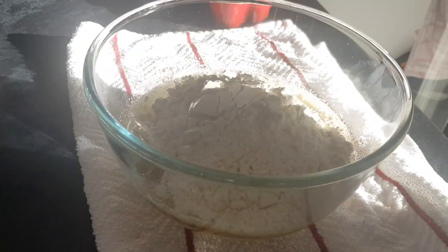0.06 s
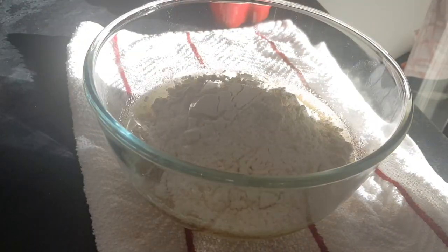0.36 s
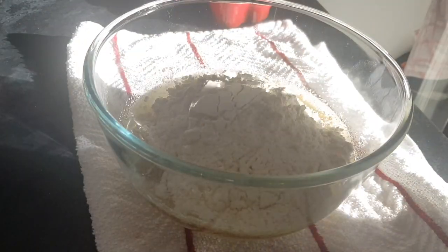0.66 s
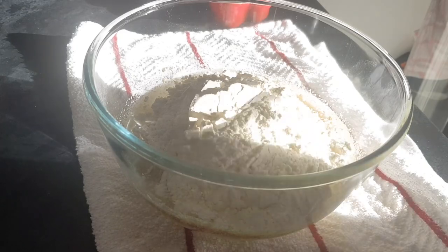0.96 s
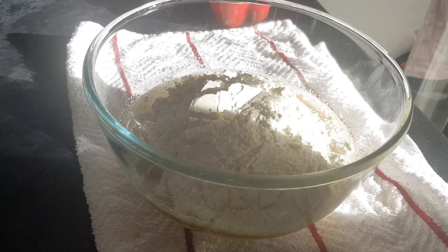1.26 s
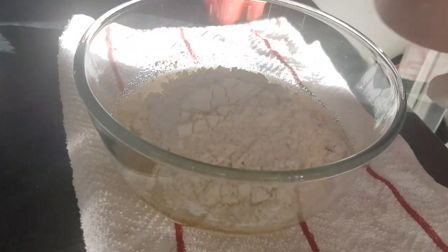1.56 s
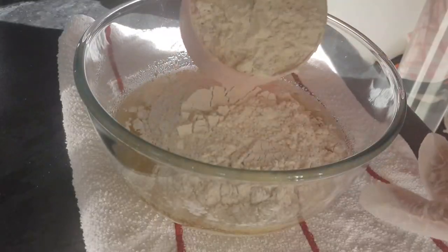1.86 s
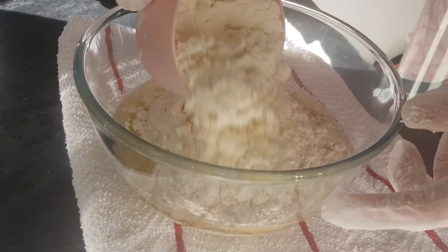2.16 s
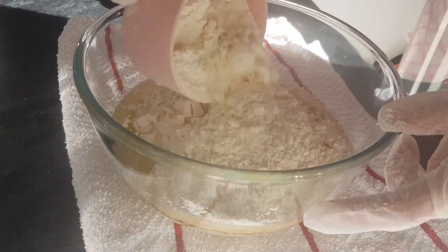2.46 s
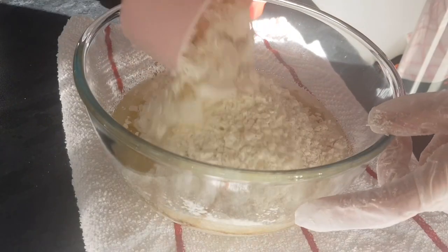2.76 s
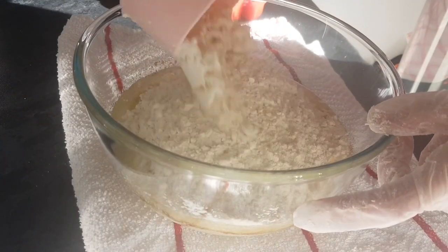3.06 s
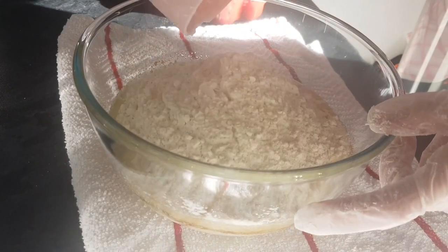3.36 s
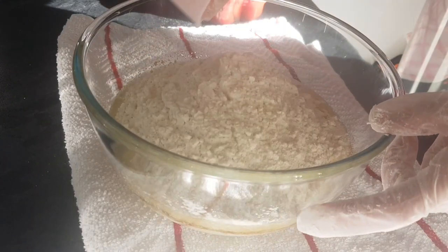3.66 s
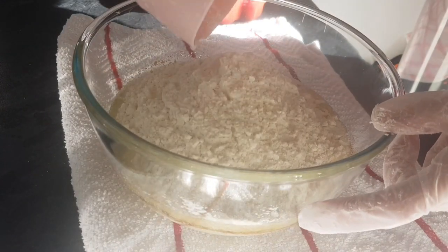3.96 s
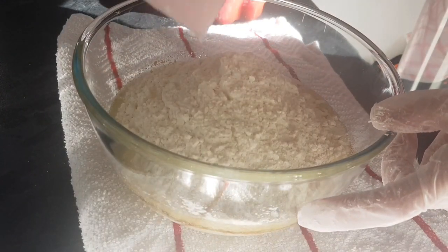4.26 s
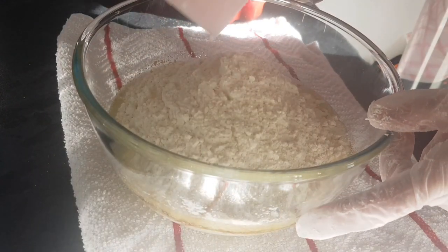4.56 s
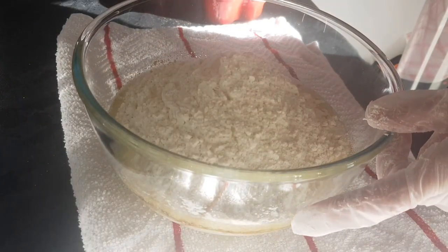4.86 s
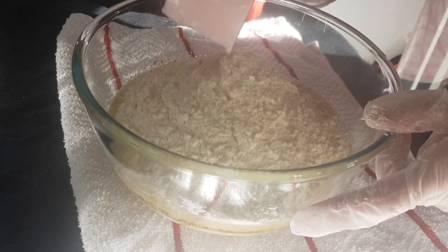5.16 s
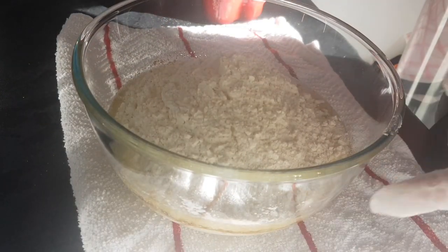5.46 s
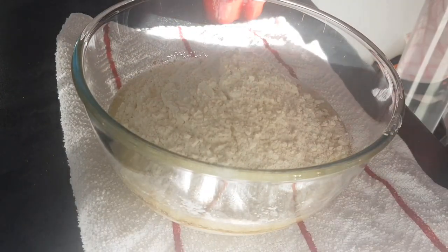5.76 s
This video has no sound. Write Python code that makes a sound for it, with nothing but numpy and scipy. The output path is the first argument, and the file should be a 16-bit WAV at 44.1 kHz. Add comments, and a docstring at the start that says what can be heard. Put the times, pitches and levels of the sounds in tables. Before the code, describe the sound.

A plastic measuring cup is knocked three times in quick succession, each a sharp crack with a short hollow ring. A gloved hand and clumps of flour then make dull, low thumps in a glass bowl resting on a towel. Flour slides out with a faint grainy hiss, the thin glove crinkles, and another muffled thud comes near the end. It sounds close, in a small kitchen with a faint appliance hum.

```python
"""Tipping flour into a bowl

In a small kitchen a plastic measuring cup is knocked three times, each a crack and a hollow ring,
then tips flour into a glass bowl on a towel. A gloved hand and falling clumps thud dully through
the worktop. Tiny slips of powder hiss, the glove crinkles, and friction sounds the air in the cup
as it scoops again. A faint appliance hum lies under it all."""
import sys
import numpy as np
from scipy import signal
from scipy.fft import rfft, irfft, next_fast_len
from scipy.io import wavfile
from scipy.ndimage import map_coordinates

SR = 44100
rng = np.random.default_rng(int(sys.argv[2]) if len(sys.argv) > 2 else 0)


def generate_wav(sig):
    """Save sig (samples, or channels by samples) to the path in sys.argv[1] as 16-bit PCM at SR."""
    pcm = np.round(np.clip(np.atleast_2d(sig).T, -1, 1) * 32767).astype(np.int16)
    wavfile.write(sys.argv[1], SR, pcm)


N = 264929
T = np.arange(N) / SR
FFT_SIZE = next_fast_len(N, real=True)
FREQ = np.maximum(np.fft.rfftfreq(FFT_SIZE, 1 / SR), 1)
HOLLOW_HZ, TOP_HZ = 695.5, 15750  # note of the air in the cup; top edge of the mix

# stereo image of diffuse noise: (frequency [Hz], left-right correlation [-1..1])
STEREO_IMAGE = [(60, 0.93), (130, 0.97), (290, 0.65), (650, 0.57), (1350, -0.18), (2500, 0.012),
                (15000, -0.021)]
# room tone of the still kitchen: (frequency [Hz], level [dB])
AIR_COLOUR = [(25, -17.5), (65, 11.5), (130, -8), (230, 0), (340, -10.5), (600, -13), (1000, -19.5),
              (2000, -21), (3400, -29.5), (6000, -59), (7400, -16.5), (8500, -43), (9600, -16),
              (11000, -30), (15500, -23.5)]
# hands lean on the worktop: (start [s], swell [s], hold [s], boom [dB], rumble [dB])
HAND_LEANS = [(-0.01, 0.013, 0.095, -48.5, -56), (0.06, .09, .17, -40.5, -53),
              (0.38, 0.085, 0.066, -53.5, -50), (0.62, 0.04, 0.063, -50.5, -58),
              (0.84, 0.025, 0.32, -50.5, -58.5), (1.22, 0.027, .09, -50, -57.5),
              (1.68, 0.022, 0.15, -57, -52.5), (3.385, 0.023, .13, -53, -62), (3.85, 0.063, 0.16, -68, -68),
              (5.13, 0.036, 0.1, -58.5, -69)]
# friction on the cup: (start [s], swell [s], hold [s], level [dB])
CUP_RUBS = [(3.385, 0.055, 0.046, -66), (3.49, 0.034, 0.0039, -60.5), (3.56, 0.034, .04, -72.5),
            (3.74, 0.042, 0.012, -73.5), (3.94, 0.06, 0.043, -67), (5.75, 0.034, .2, -82.5)]
# short dry clicks: (time [s], level [dB], t60 [s])
DRY_TICKS = [(0.424, -39.5, 0.063), (1.344, -52, 0.0068), (5.756, -65.5, 0.029)]
# glove and cup slide over powder: (start [s], swell [s], hold [s], hiss [dB], crinkle [dB])
POWDER_SLIDES = [(0.0, 0.0079, 0.037, -67, -56.5), (0.03, 0.054, 0.028, -56.5, -60.5),
                 (0.16, 0.0057, 0.096, -66.5, -56.5), (0.362, 0.02, 0.063, -62.5, -56.5),
                 (0.4, 0.056, 0.032, -53, -55), (0.655, .04, 0.032, -70, -86), (0.95, .05, 0.12, -64, -84),
                 (1.13, 0.031, .07, -70.5, -74), (1.32, 0.046, 0.054, -67.5, -71),
                 (1.385, 0.056, 0.051, -55, -55.5), (1.49, 0.076, 0.021, -55.5, -62),
                 (1.695, 0.024, 0.014, -64.5, -71), (2.592, 0.027, .005, -61, -74),
                 (3.14, .04, 0.062, -73, -82), (3.205, 0.051, 0.025, -62.5, -79),
                 (3.375, 0.065, 0.16, -66, -75), (3.475, 0.045, 0.038, -64, -67.5),
                 (3.57, 0.046, 0.019, -61.5, -71), (3.73, 0.042, .07, -62.5, -76),
                 (3.882, 0.027, 0.011, -63.5, -85), (3.935, 0.05, 0.023, -54.5, -60.5),
                 (4.015, .04, 0.02, -54.5, -57.5), (4.12, 0.03, .02, -67, -71),
                 (4.255, 0.031, 0.0044, -60, -69.5), (4.325, 0.031, 0.0058, -62, -65),
                 (4.755, 0.042, 0.013, -57, -63), (4.835, .03, 0.0098, -60, -81),
                 (4.9, 0.075, 0.0046, -62, -89), (5.04, 0.044, 0.013, -58.5, -57),
                 (5.22, 0.041, 0.0051, -69.5, -71.5), (5.23, 0.16, .06, -62.5, -86),
                 (5.48, 0.032, 0.058, -72.5, -82), (5.815, 0.085, 0.027, -53.5, -54.5)]
# the glove breaks loose and slides to rest: (time [s], hiss [dB], crinkle [dB], t60 [s])
GLOVE_BRUSHES = [(0.911, -57.5, -60.5, 0.63), (1.564, -43, -46, 0.15), (3.694, -59, -91, .1),
                 (4.580, -64.5, -71, 0.12), (4.996, -52, -59.5, 0.51), (5.461, -57, -82, 0.11),
                 (5.756, -53, -55.5, 0.38)]
# flour flows out of the tilted cup: (time [s], level [dB])
POUR_FLOW = [(1.78, -71.5), (1.92, -62.5), (1.98, -66.5), (2.11, -58.5), (2.2, -69.5), (2.27, -73),
             (2.34, -95), (2.45, -69), (2.7, -83), (3.0, -81)]
# the hollow of the glove follows the grip: (time [s], resonance [Hz], width [Hz])
GRIP_RESONANCE = [(0.449, 3120, 1390), (0.95, 2758, 404.6), (1.15, 2573, 1184), (1.45, 3022, 899),
                  (1.75, 2963, 606.5), (2.1, 2466, 1104), (3.55, 2687, 797), (4.049, 2643, 599),
                  (4.349, 2790, 319.4), (5.081, 2762, 351), (5.501, 2700, 694), (5.78, 2480, 654),
                  (6.0, 2487, 597)]
# hiss of sliding powder and glove: (frequency [Hz], level [dB])
HISS_COLOUR = [(500, -11), (1200, -10.5), (1800, -9.5), (2600, -5.5), (3400, -7.5), (4200, -4.5),
               (5200, -2), (6300, 1.5), (8300, 0), (9500, 2.5), (11500, 1.5), (13700, -1), (15500, -0.5)]
# soft blows of hand, bowl and flour clumps: (time [s], level [dB], pitch [Hz], swell [s], slap [dB])
SOFT_BLOWS = [(1.486, -43.5, 170, 0.015, 4), (1.492, -47.5, 514, 0.015, -11), (1.494, -40.5, 68, 0.028, -7),
              (1.512, -42, 226, 0.021, -20), (1.55, -35, 98.6, 0.024, -13.5),
              (1.617, -29.5, 64, 0.023, -15.5), (1.865, -20, 124, 0.0091, -25),
              (1.898, -37.5, 142, 0.013, -7.5), (1.935, -49.5, 86, 0.035, -5),
              (2.555, -43, 65.5, 0.035, -15), (2.72, -54.5, 84.4, 0.029, -8.5),
              (2.782, -40, 76.5, 0.022, -18), (2.789, -43.5, 202, 0.029, -25), (2.839, -49, 68, 0.033, -9),
              (4.564, -50, 66, 0.053, -9), (4.918, -34.5, 83, 0.019, -22), (4.924, -44, 261.3, 0.026, -17),
              (4.947, -26.5, 73, 0.016, -41), (4.972, -40, 232, 0.018, -9),
              (5.032, -42.5, 65.8, 0.037, -18)]
# low modes of the bowl on the worktop: (frequency [Hz], level [dB])
WORKTOP_MODES = [(67, 3), (86, -1), (135, 1), (174, -6.5), (214, -1), (276, -6), (514, -9)]
# slap of a soft blow: (frequency [Hz], level [dB])
SLAP_COLOUR = [(40, 1), (120, 8), (250, 5), (370, -10), (520, -10), (720, -16), (1000, -34), (2000, -44),
               (8000, -30.5)]
# three knocks and a rebound: (time [s], level [dB], tilt [dB/octave], hollow ring [dB], crack [dB])
CUP_KNOCKS = [(-0.003, -38.5, 1.5, 3, 2), (0.1671, -37, 0.34, -24, -4.5), (0.3712, -38.5, -1.5, 8, -1),
              (0.3818, -49, -3.5, 17.5, -15)]
# modes of the cup wall: (frequency [Hz], level [dB], t60 before capping [s])
CUP_MODES = [(280.7, -15, 0.81), (389, 0, 0.17), (537.5, -1.5, 0.52), (579, -9, 0.5), (723, 0.5, 0.44),
             (790, 6, 0.21), (880, -19, 0.206), (830, -24, 0.38), (977, -46, 0.069), (1122, 2, 0.2),
             (1163, -10.5, 0.25), (1195, -19, 0.16), (1379, 11, 0.035), (1380, -9, 0.039),
             (1407, -26, 0.14), (1660, -18, 0.3), (1742, -12.5, 0.44), (2315, -10.5, 0.22),
             (2750, -24, 0.46), (2800, -12.5, 0.27), (3160, -29, 0.35), (4040, -19, 0.43)]
# transient of a hard contact: (frequency [Hz], level [dB])
CRACK_COLOUR = [(150, 10), (700, 11), (1400, 9.5), (2800, -1), (4300, -3), (5500, -17), (15000, -27)]
# dense tail of a knock: (frequency [Hz], level [dB])
CLATTER_COLOUR = [(100, -11), (160, -2.5), (300, -3.5), (550, -0.5), (800, -1), (1400, -7.5), (2050, -17),
                  (2650, -14.5), (3300, -56), (4300, -38), (5200, -27.5), (9000, -40.5), (15000, -53)]


def undb(db):
    """Decibels to gain."""
    return 10 ** (np.asarray(db) / 20)


def unit(x):
    """Scale to rms 1."""
    return x / np.sqrt(np.mean(x ** 2))


def pan(db):
    """Channel gains for a left-minus-right level."""
    return undb(np.array([[db], [-db]]) / 2)


def curve(points):
    """Join (frequency, value) points on a log-frequency axis."""
    hz, value = np.transpose(points)
    return np.interp(np.log(FREQ), np.log(hz), value)


def resonance(hz, width_hz):
    """Response of one resonance, gain 1 at its centre."""
    return 1 / (1 + 1j * (FREQ / hz - hz / FREQ) * hz / width_hz)


def eq(x, response):
    """Filter by a frequency response."""
    return irfft(rfft(x, FFT_SIZE) * response, FFT_SIZE)[..., :N]


def noise(response):
    """Coloured stereo noise: narrow in the bass, wide in the treble."""
    alike = curve(STEREO_IMAGE)
    mid, side = (eq(rng.standard_normal(N), response * np.sqrt(1 + sign * alike)) for sign in (1, -1))
    return unit(np.array([mid + side, mid - side]))


def moving_band(hz, width_hz):
    """Swept stereo noise band: a carrier whose random modulation runs faster where the band is wider."""
    cycles = np.cumsum(width_hz) / SR
    size = int(cycles[-1]) + 2
    points = [rng.standard_normal(size) + 1j * rng.standard_normal(size) for _ in range(2)]
    modulation = np.array([map_coordinates(side, [cycles], order=2) for side in points])
    carrier = np.exp(2j * np.pi * np.cumsum(hz) / SR)
    return unit(np.real(modulation * carrier))


def drift(rate_hz):
    """Smooth random modulation, rms 1."""
    return unit(eq(rng.standard_normal(N), np.exp(-(FREQ / rate_hz) ** 2)))


def fade(t, t60):
    """Exponential decay, 60 dB down at t60."""
    return np.exp(-np.log(1000) * t / t60)


def attack(t, rise_s):
    """Exponential rise towards 1."""
    return 1 - np.exp(-t / rise_s)


def swell(t, peak_s):
    """A soft contact: builds up to 1 at peak_s, then lets go."""
    return (t / peak_s * np.exp(1 - t / peak_s)) ** 2.52


def add(out, s, sound):
    """Mix a sound in at time s."""
    start = int(s * SR)
    lo, hi = max(start, 0), min(start + sound.shape[-1], N)
    out[:, lo:hi] += sound[..., lo - start:hi - start]


def strokes(rows, release_t60):
    """One gain track per dB column: every stroke swells, holds and dies away."""
    power, t = np.zeros((len(rows[0]) - 3, N)), T[:SR]
    for s, swell_s, hold_s, *levels_db in rows:
        rise = np.sin(np.pi / 2 * np.clip(t / swell_s, 0, 1)) ** 2
        release = fade(np.maximum(t - swell_s - hold_s, 0), release_t60)
        add(power, s, np.outer(undb(levels_db), rise * release) ** 2)
    return np.sqrt(power)


def slips(per_s, t60, spread_db):
    """Grain envelope of random little slips that each start at once and die away; rms 1."""
    kicks = (rng.random(N) < per_s / SR) * undb(spread_db * rng.standard_normal(N))
    return unit(signal.lfilter([1], [1, -fade(1 / SR, t60)], kicks))


def room(x, wet_db, t60):
    """The sound plus the short diffuse tail of the kitchen."""
    t = T[:SR // 2]
    tail = noise(1)[:, :len(t)] * fade(t, t60) * attack(t, 0.016)
    tail /= np.sqrt(np.sum(tail ** 2) / 2)
    return x + undb(wet_db) * signal.fftconvolve(x, tail, axes=1)[:, :N]


def kitchen():
    """The bed: still air and the soft hum of an appliance."""
    air = undb(-67.5) * noise(undb(curve(AIR_COLOUR)))
    hum = undb(-73) * noise(resonance(458.6, 55) ** 2)
    return air * pan(0.8) + hum * pan(-5)


def worktop():
    """Leaning hands keep the worktop's lowest mode booming unevenly, with a rumble above it."""
    tremor = undb([[-74.5], [-75]])  # boom and rumble under resting hands
    boom_gain, rumble_gain = np.hypot(strokes(HAND_LEANS, release_t60=0.26), tremor)
    boom_hz = 67 + 3.6 * drift(15.2)
    mode = unit(np.sin(2 * np.pi * np.cumsum(boom_hz) / SR))
    sub = undb(-16.5) * noise(resonance(26, 15) ** 2)
    rumble = noise(resonance(109.2, 50) ** 2 + undb(-11.5) * resonance(187, 90.2) ** 2)
    boom = (mode + sub) * undb(-2 + 1.1 * drift(7.5))
    return (boom_gain * boom + rumble_gain * rumble) * pan(1.7)


def cup_rubs():
    """Uneven friction excites the air in the cup."""
    force, = strokes(CUP_RUBS, release_t60=0.27)
    body = noise(resonance(HOLLOW_HZ, 134) ** 2 + undb(-20.5) * resonance(2210, 180))
    return force * body * undb(3 + 0.98 * drift(45)) * pan(4.9)


def dry_ticks():
    """Short dry clicks: all transient, no ring."""
    envelope = np.zeros((2, N))
    for s, db, t60 in DRY_TICKS:
        add(envelope, s, undb(db) * fade(T[:SR // 8], t60))
    return envelope * noise(undb(curve(CRACK_COLOUR))) * pan(-2.6)


def handling():
    """Gain tracks for hiss and crinkle: slides, sudden brushes, the pour and a faint fidgeting."""
    power, t = strokes(POWDER_SLIDES, release_t60=0.26) ** 2, T[:SR // 2]
    for s, hiss_db, crinkle_db, t60 in GLOVE_BRUSHES:
        envelope = attack(t, 0.003) * fade(t, t60)
        add(power, s, np.outer(undb([hiss_db, crinkle_db]), envelope) ** 2)
    times, flow_db = np.transpose(POUR_FLOW)
    gate = np.clip(np.minimum(T - times[0], times[-1] - T) / 0.01 + 0.5, 0, 1)
    flow = gate * undb(np.interp(T, times, flow_db))
    pour = np.array([flow, undb(-11) * flow])  # flour scraping the cup wall feeds the crinkle
    fidget = undb([[-75.5], [-85.5]]) * undb(1.5 * drift(4.5))  # the hand is never quite still
    return np.sqrt(power + pour ** 2 + fidget ** 2)


def glove(gain):
    """The thin glove crinkles through a resonance that moves with the grip, and a weaker one above."""
    times, *columns = np.transpose(GRIP_RESONANCE)
    hz, width_hz = (np.interp(T, times, column) for column in columns)
    core = moving_band(hz, width_hz)
    skirts = undb(-4) * moving_band(hz, 2.2 * width_hz)
    upper = undb(-2.5) * noise(resonance(4150, 960) ** 2)
    grain = unit(0.5 + 0.33 * slips(per_s=140, t60=0.045, spread_db=6.5))
    return undb(-5.5) * gain * (core + skirts + upper) * grain * pan(-3.5)


def powder(gain):
    """Countless tiny slips of flour and glove: a grainy hiss whose bands each swell on their own."""
    hiss = noise(undb(curve(HISS_COLOUR)))
    edges_hz = np.linspace(0, TOP_HZ + 500, 19)
    shimmer = sum(eq(hiss, (FREQ >= lo) & (FREQ < hi)) * undb(2.1 * drift(12.4))
                  for lo, hi in zip(edges_hz, edges_hz[1:]))
    coarse = slips(per_s=11, t60=0.037, spread_db=9)
    fine = slips(per_s=410, t60=0.0049, spread_db=1)
    grain = unit(3 + 0.31 * coarse + 0.4 * fine)
    return undb(0.5) * gain * shimmer * grain * pan(-0.34)


def thumps():
    """The towel damps each blow to a few low cycles of the worktop, with a slap of hand or powder."""
    out, t = np.zeros((2, N)), T[:SR // 3]
    slap_noise = noise(undb(curve(SLAP_COLOUR)))
    mode_hz, mode_db = np.transpose(WORKTOP_MODES)[:, :, None]
    for s, db, pitch_hz, swell_s, slap_db in SOFT_BLOWS:
        octaves_off = np.abs(np.log2(mode_hz / pitch_hz))
        share = undb(mode_db - 17.5 * octaves_off)  # a blow favours the modes near its pitch
        peak_s = swell_s * (pitch_hz / mode_hz) ** 0.38  # lower modes swell and fade more slowly
        modes = share * swell(t, peak_s) * np.sin(2 * np.pi * mode_hz * t)
        body = modes.sum(axis=0) / np.linalg.norm(share)
        slap = undb(slap_db) * slap_noise[:, int(s * SR):][:, :len(t)] * swell(t, swell_s)
        add(out, s, undb(db) * (body + slap))
    low_cut = signal.cheby1(2, 2, 46, "highpass", fs=SR, output="sos")  # takes out the deepest bass
    return room(signal.sosfilt(low_cut, out), wet_db=-3.5, t60=0.22) * pan(2.08)


def cup_knocks():
    """Each knock cracks, rings the cup wall and the air inside, and clatters away round the room."""
    out, t = np.zeros((2, N)), T[:SR * 3 // 4]
    for s, db, tilt_db, hollow_db, crack_db in CUP_KNOCKS:
        colour = undb(curve(CLATTER_COLOUR) + tilt_db * np.log2(FREQ / HOLLOW_HZ))
        clatter = undb(2) * noise(colour)[:, :len(t)] * fade(t, t60=0.38)
        crack = undb(crack_db) * noise(undb(curve(CRACK_COLOUR)))[:, :len(t)] * fade(t, t60=0.05)
        wall = 0
        for hz, mode_db, t60 in CUP_MODES:
            # higher modes reach the two sides further out of step
            phase = rng.uniform(0, 2 * np.pi) + rng.standard_normal((2, 1)) * hz / 800
            gain = undb(mode_db + tilt_db * np.log2(hz / HOLLOW_HZ))
            wall += gain * np.sin(2 * np.pi * hz * t + phase) * fade(t, min(t60, 0.4))
        hollow = undb(hollow_db) * np.sin(2 * np.pi * HOLLOW_HZ * t) * fade(t, t60=0.18)
        body = (clatter + undb(-4.5) * wall + hollow) * attack(t, 0.0011)
        add(out, s, undb(db) * (crack + body))
    return out * pan(0.52)


def scene():
    """Hits and handling textures over the kitchen bed."""
    hiss_gain, crinkle_gain = handling()
    hits = cup_knocks() + dry_ticks() + thumps()
    return hits + worktop() + powder(hiss_gain) + glove(crinkle_gain) + cup_rubs() + kitchen()


def record(dry):
    """A steep high cut on the whole mix."""
    return signal.sosfilt(signal.ellip(12, 0.1, 80, TOP_HZ, fs=SR, output="sos"), dry)


dry = scene()
out = record(dry)
generate_wav(out)
```